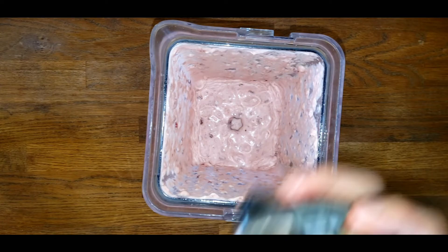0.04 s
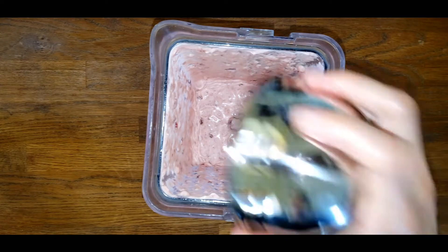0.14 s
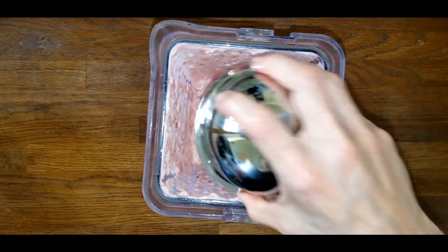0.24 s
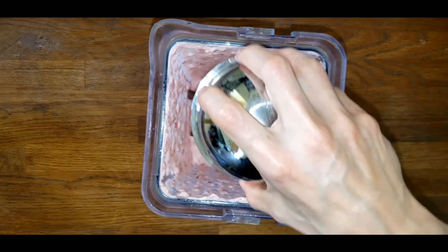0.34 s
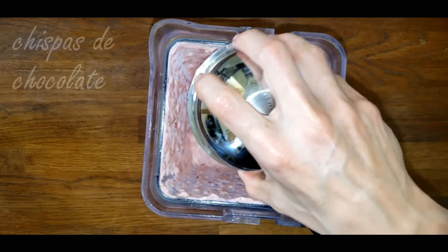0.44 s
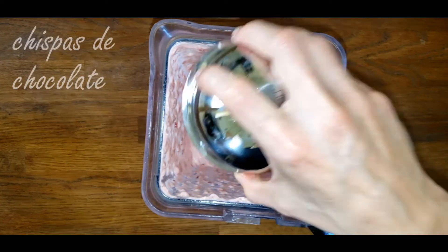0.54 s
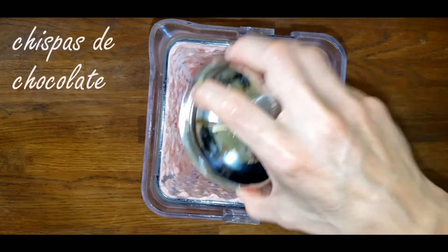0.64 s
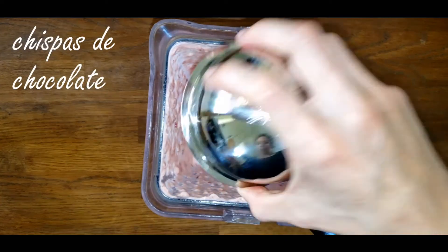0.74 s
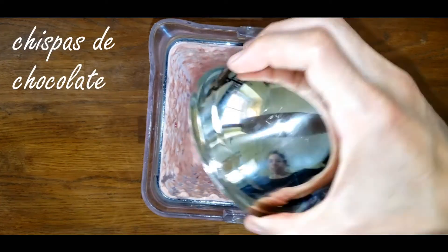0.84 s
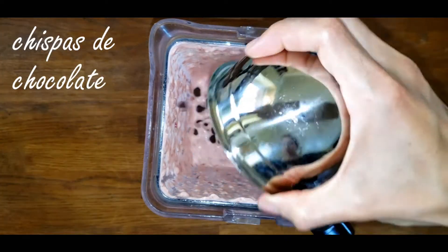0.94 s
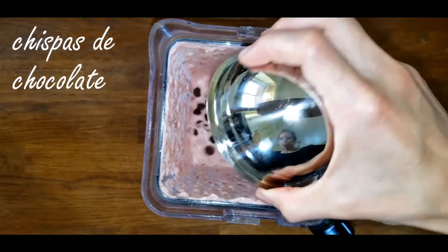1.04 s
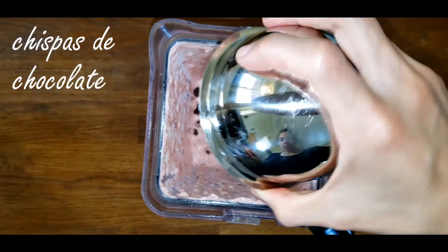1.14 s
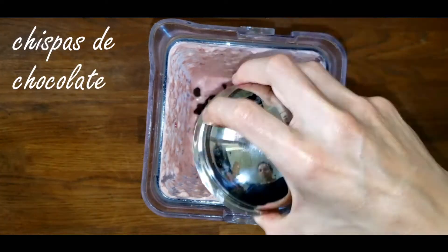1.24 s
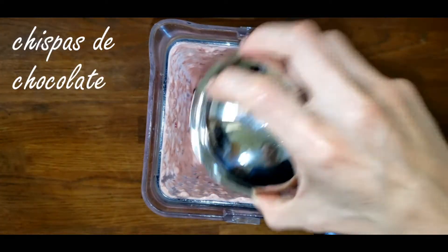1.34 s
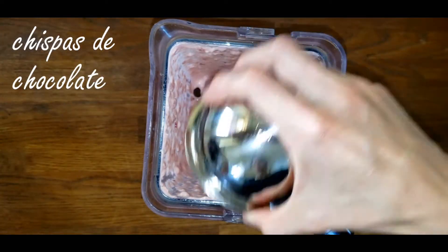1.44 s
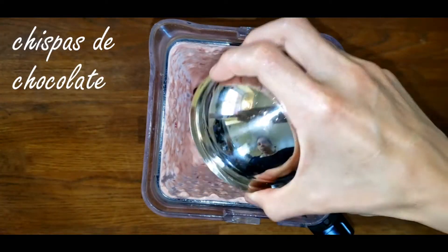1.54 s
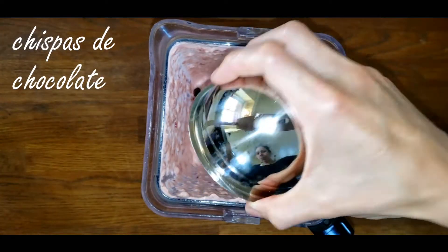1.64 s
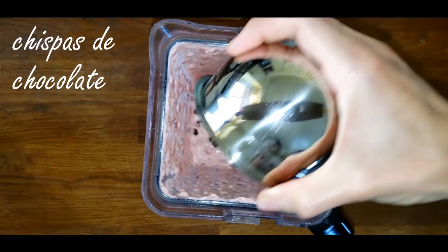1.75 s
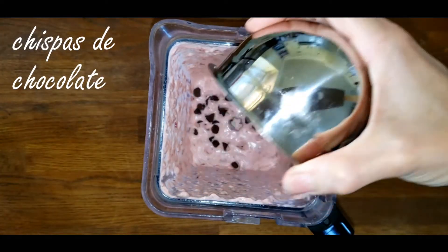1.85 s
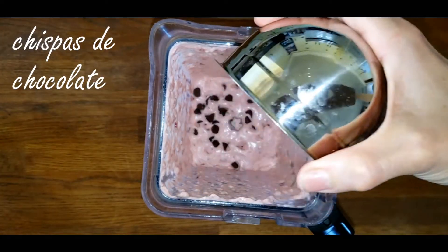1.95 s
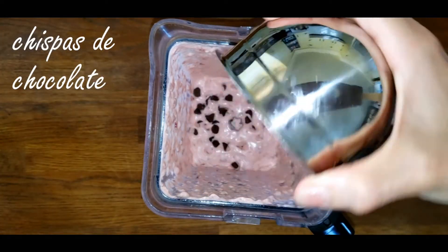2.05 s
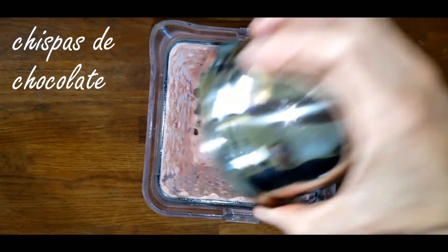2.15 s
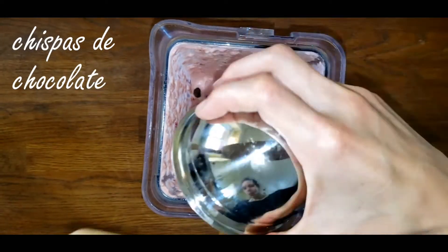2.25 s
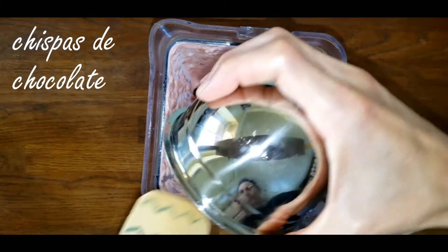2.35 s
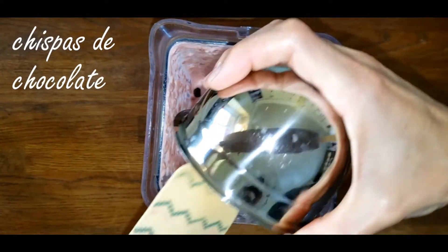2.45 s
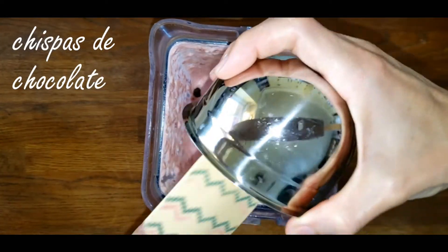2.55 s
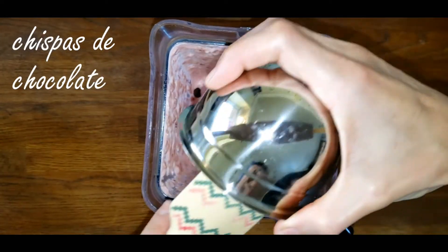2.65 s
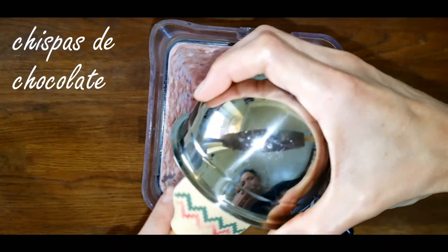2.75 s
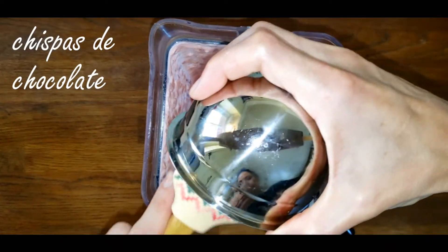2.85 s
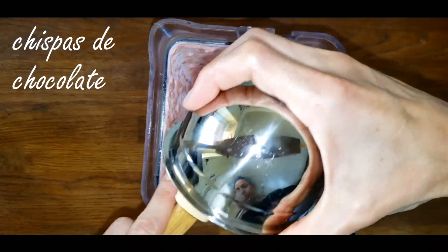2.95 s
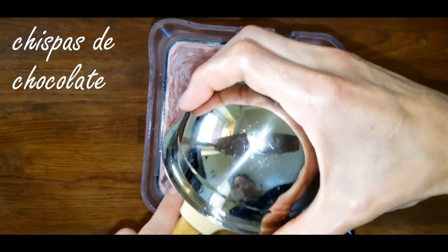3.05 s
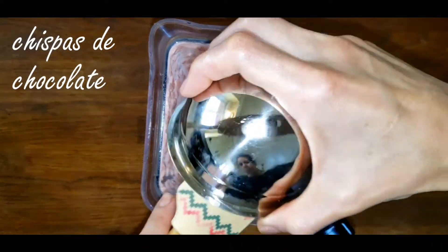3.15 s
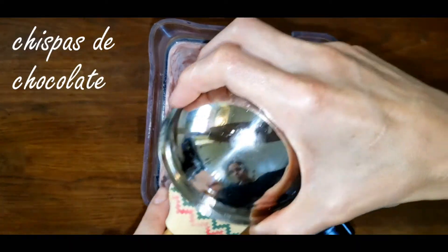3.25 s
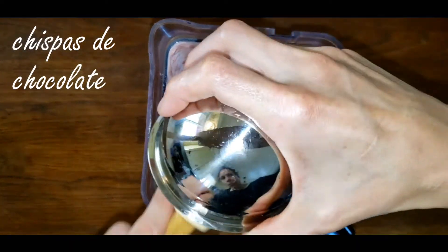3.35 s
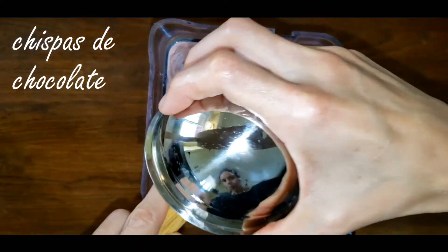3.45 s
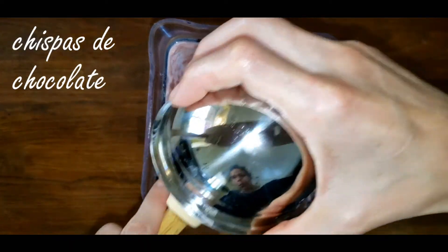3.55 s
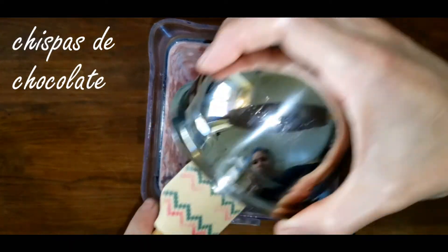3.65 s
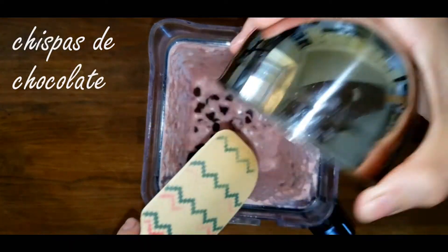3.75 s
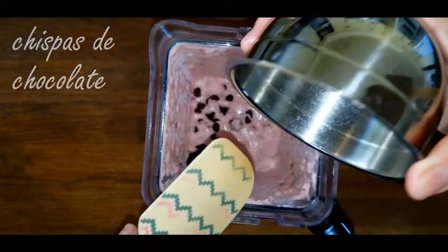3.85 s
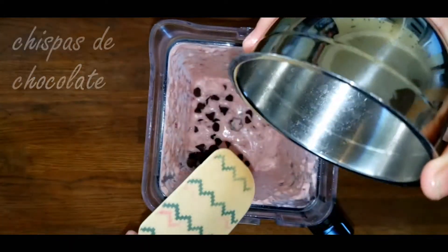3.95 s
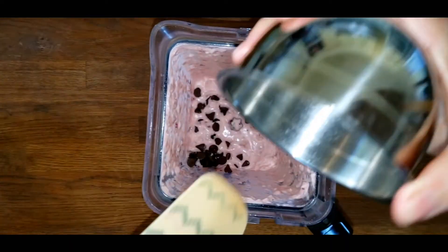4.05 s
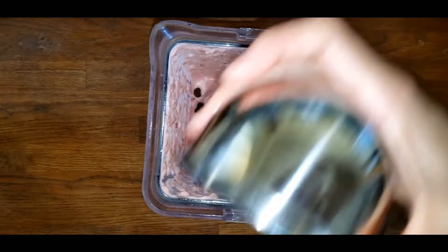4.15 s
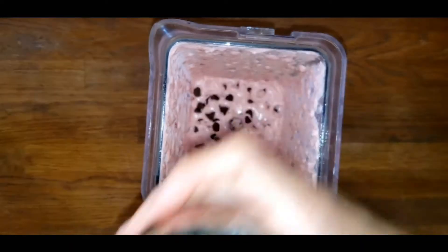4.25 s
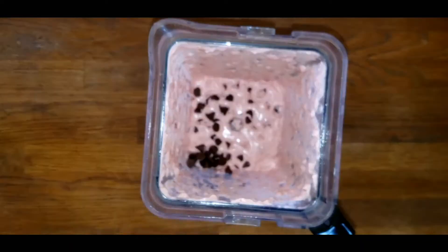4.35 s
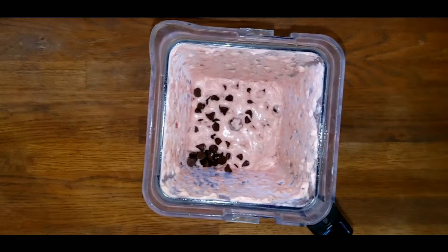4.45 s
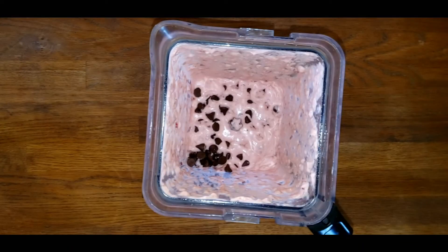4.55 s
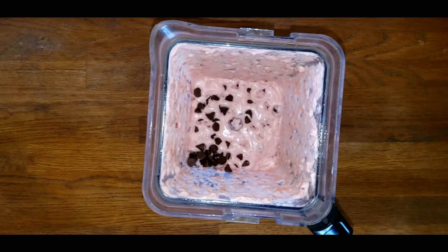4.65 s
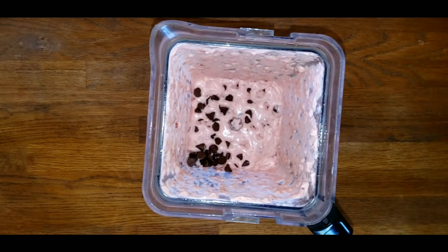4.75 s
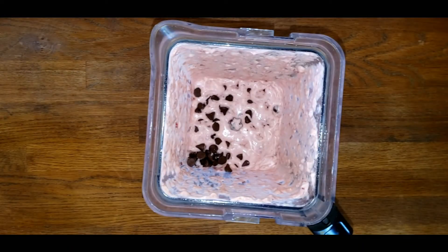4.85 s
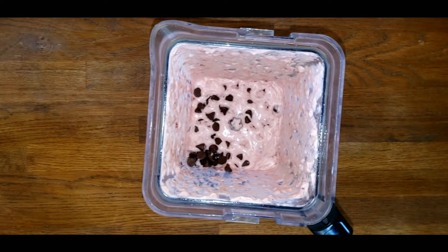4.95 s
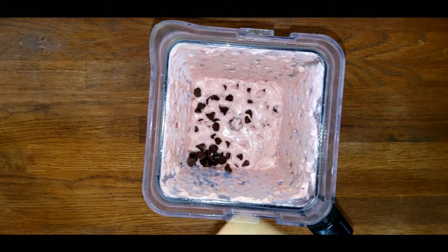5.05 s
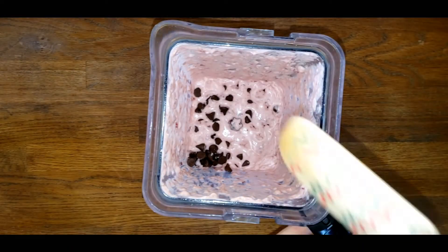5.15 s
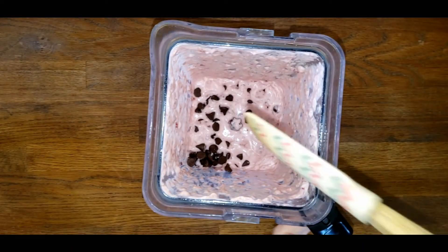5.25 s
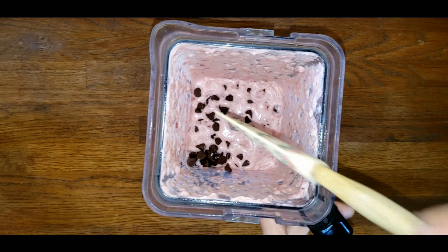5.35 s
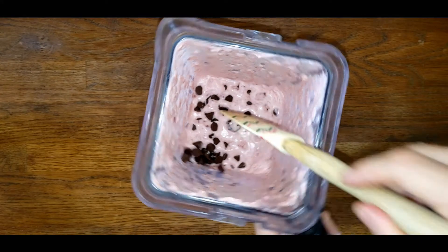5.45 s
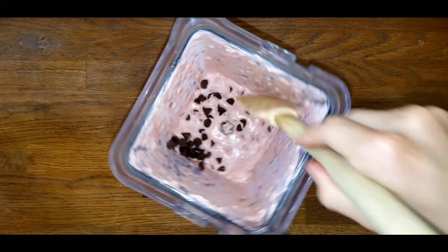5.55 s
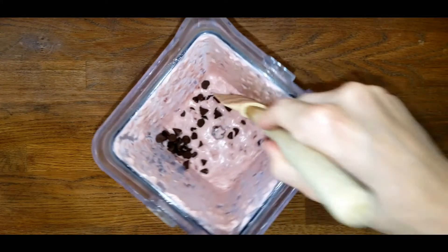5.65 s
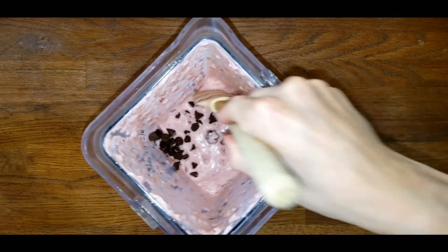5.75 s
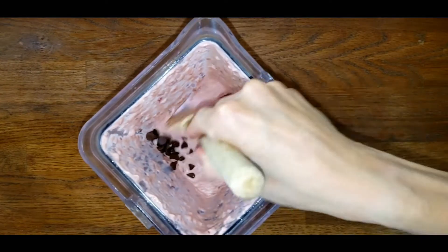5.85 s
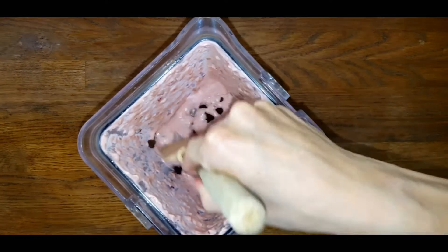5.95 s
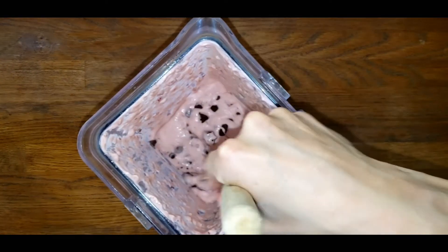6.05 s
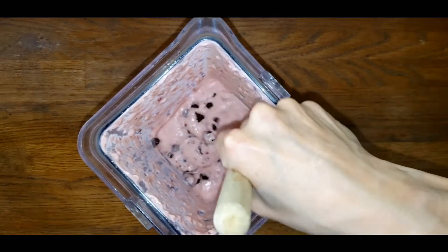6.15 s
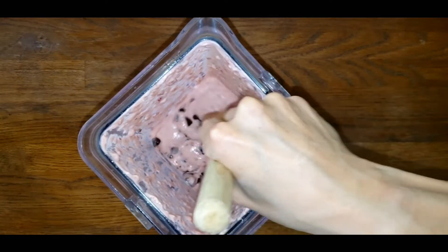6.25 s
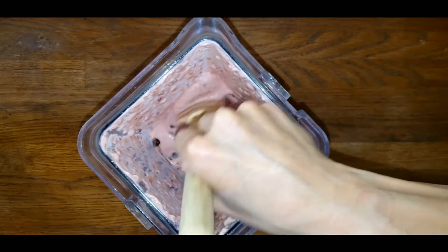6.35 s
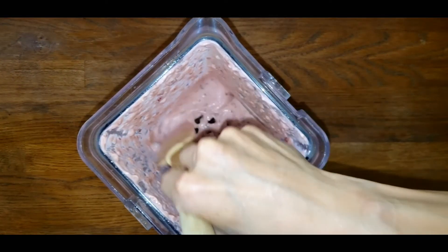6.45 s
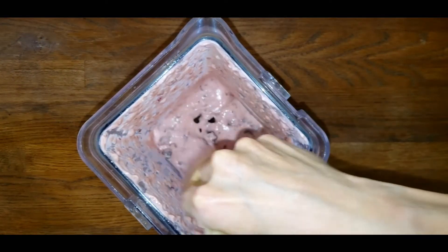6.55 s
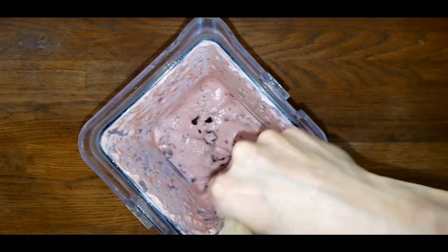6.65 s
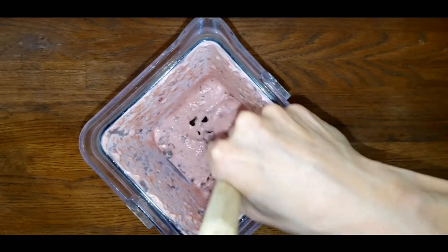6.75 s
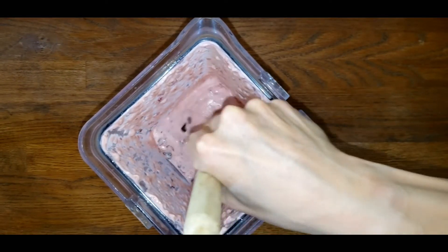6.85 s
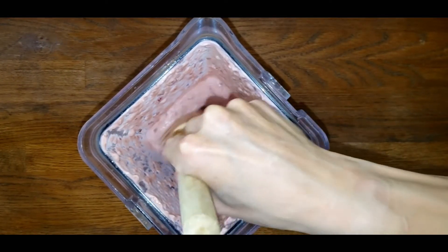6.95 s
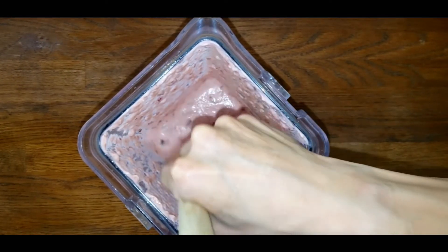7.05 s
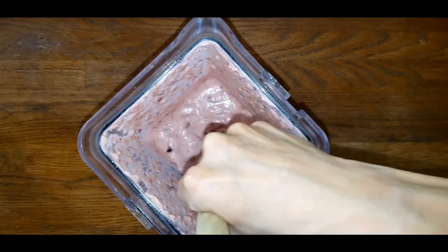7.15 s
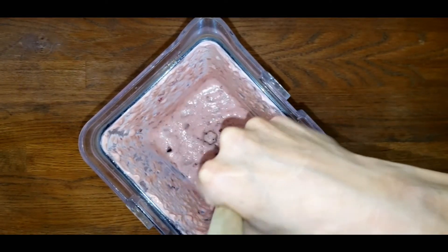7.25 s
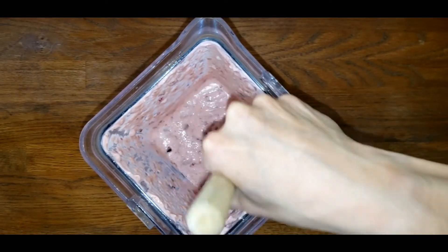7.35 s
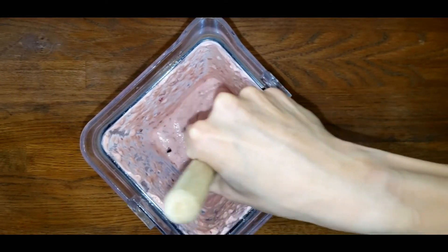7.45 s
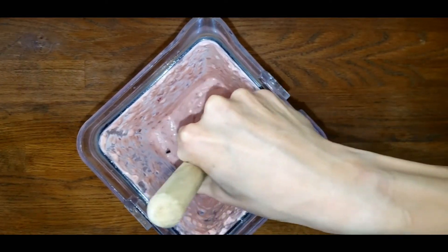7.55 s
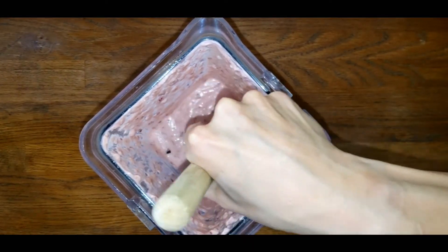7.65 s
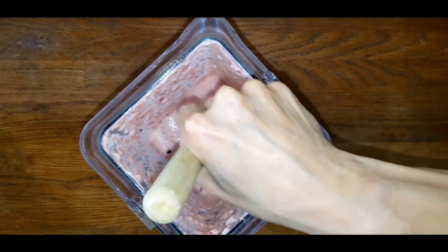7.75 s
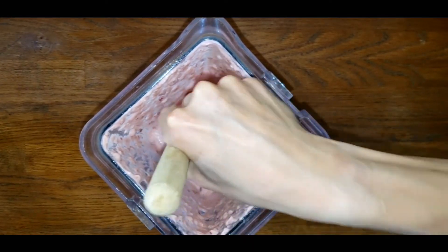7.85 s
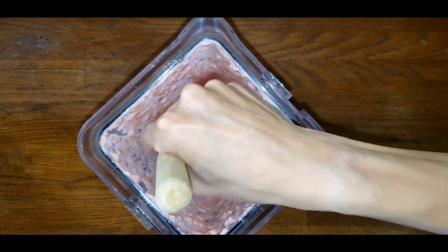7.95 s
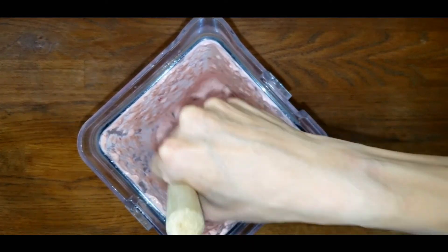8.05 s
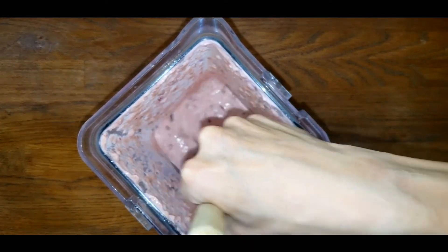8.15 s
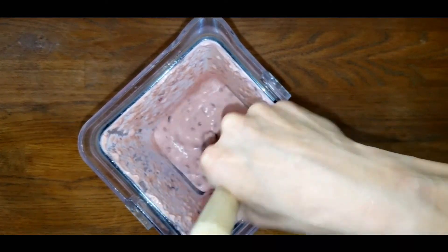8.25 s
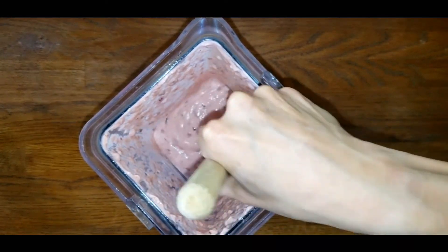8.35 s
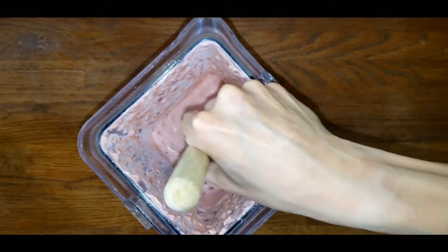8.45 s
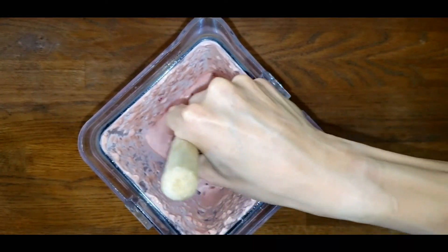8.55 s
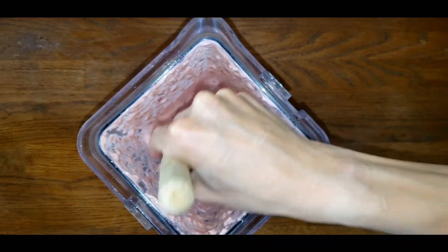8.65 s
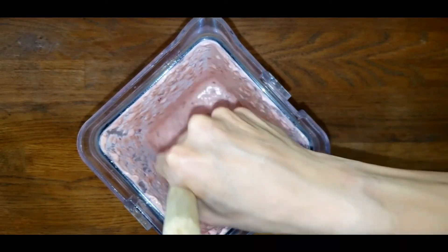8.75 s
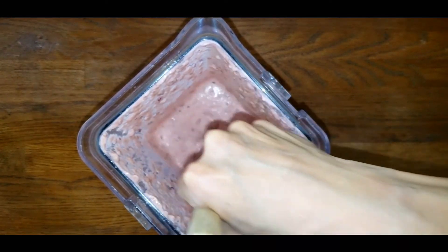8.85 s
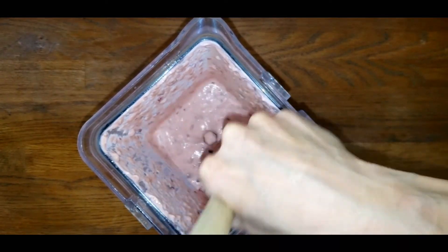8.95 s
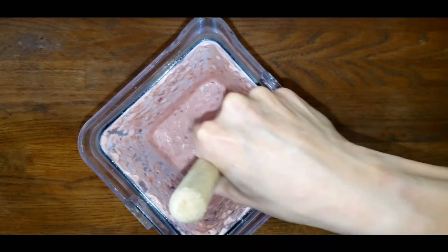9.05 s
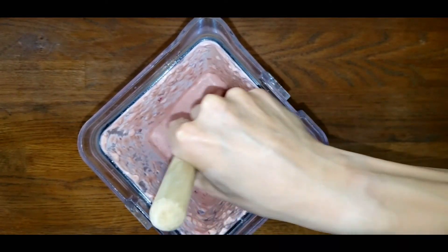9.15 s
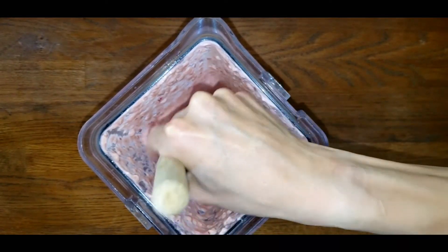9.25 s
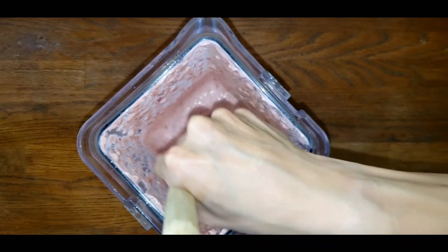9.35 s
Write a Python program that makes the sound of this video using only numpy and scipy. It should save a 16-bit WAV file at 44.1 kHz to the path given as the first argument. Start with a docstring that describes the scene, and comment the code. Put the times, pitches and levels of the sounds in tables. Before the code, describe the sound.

Small chocolate chips rattle in bursts from a steel bowl into a plastic jar of cream, then a spatula scrapes, squelches and knocks while stirring.

```python
"""Chocolate chips, poured four times from a small steel bowl, clink on the steel and land in a plastic jar of cream.
Clinks, knocks and thuds are noise bursts plus decaying modes; streams of chips are showers of short contacts.
The jar is then pushed round on a wooden table: stick-slip grains drive the table and body modes.
A spatula stirs: it rubs and scrapes the wall, pops air pockets in the cream, knocks the jar and rocks it.
A quiet kitchen adds low noise, hum and reverberation; a stereo microphone looks down from just above."""
import sys
import numpy as np
from scipy import signal
from scipy.fft import irfft
from scipy.io import wavfile
from scipy.ndimage import uniform_filter1d

SR = 44100
rng = np.random.default_rng(int(sys.argv[2]) if len(sys.argv) > 2 else 0)


def unload_audio(sound):
    """Save the sound as a 16-bit wav file, at the path given as the first command line argument."""
    columns = np.transpose(np.atleast_2d(sound))
    # keep every value between -1 and 1, then stretch to whole-number steps
    steps = np.round(np.clip(columns, -1, 1) * 32767)
    wavfile.write(sys.argv[1], SR, steps.astype(np.int16))


N = 414099

# All table levels are relative: each function adds its own gains.


def gain_of(db):
    """Amplitude gain of a level in dB."""
    return 10 ** (np.asarray(db) / 20)


def evened(x):
    """Scales to rms 1."""
    return x / np.sqrt(np.mean(x ** 2) + 1e-20)


def blow(x):
    """Scales a hit to rms 1 over its first 20 ms."""
    return x / np.sqrt(np.mean(x[:, :SR // 50] ** 2) + 1e-20)


def held(x, size=2600):
    """Evens out slow swells, as a steady hand pressure does."""
    power = (x ** 2).mean(0)
    power = uniform_filter1d(uniform_filter1d(power, size), size)
    return x / np.sqrt(abs(power) + 1e-9)


def read(points, hz):
    """Interpolates a spectrum on a log-frequency axis."""
    f, value = np.transpose(points)
    return np.interp(np.log(hz + 1), np.log(f), value)


def level(rows, axis):
    """One dB column of a curve as a gain, silent outside its span."""
    rows = np.array(rows)
    t = np.arange(N) / SR
    return gain_of(np.interp(t, rows[:, 0], rows[:, axis], left=-120, right=-120))


def spells(starts, lengths, dbs, rise_s, fall_s, size=5000):
    """Gain over time for a set of movements: each rises, holds for its length and dies away."""
    t = np.linspace(0, N / SR, size)
    since = t[:, None] - starts
    rise = np.clip(since / rise_s, 0, 1)
    fall = np.exp(-np.maximum(since - lengths, 0) / fall_s)
    gain = np.linalg.norm(gain_of(dbs) * rise * fall, axis=1)
    return np.interp(np.arange(N) / SR, t, gain)


def add(mix, s, sound):
    """Mixes a stereo sound in at time s."""
    part = mix[:, max(round(s * SR), 0):][:, :sound.shape[1]]
    part += sound[:, :part.shape[1]]


def pair(z, width):
    """Makes left and right from two signals taken as mid and side."""
    return np.array([z[0] + width * z[1], z[0] - width * z[1]]) / np.hypot(1, width)


def colour(x, spectrum, size=2048):
    """Minimum-phase filter with the given spectrum and energy 1."""
    hz = abs(np.fft.fftfreq(size, 1 / SR))
    log_gain = np.log(gain_of(read(spectrum, hz)))
    taps = np.fft.ifft(np.exp(signal.hilbert(log_gain).conj())).real
    return signal.oaconvolve(x, taps[None] / np.linalg.norm(taps), axes=1)[:, :x.shape[1]]


def varied(spectrum, bumps_db=4.0, shift_oct=0.27):
    """Chips differ in size and shape, and so in pitch and colour."""
    factor = 2 ** (shift_oct * rng.uniform(-1, 1))
    grid_hz = np.geomspace(100, 16000, 26)
    db = read(spectrum, grid_hz / factor) + bumps_db * rng.uniform(-2, 2, len(grid_hz))
    return list(zip(grid_hz, db))


def favour(modes, centre_hz, depth_db):
    """The place of a blow brings out the modes near one pitch: others lose 45 dB/octave, at most depth_db."""
    return [(hz, db - min(45 * abs(np.log2(hz / centre_hz)), depth_db), t60) for hz, db, t60 in modes]


def ring(modes, width, detune, rise_s, size=12000):
    """A struck object: decaying sines, weighted and detuned afresh at each blow."""
    hz, db, t60 = np.transpose(modes)[:, :, None]
    t = np.arange(size, dtype=np.float32) / SR
    weight, shift, phase, apart = rng.uniform(-1.155, 1, (4, len(hz), 1)).astype(np.float32)
    angle = (2 * np.pi * hz * (1 + detune * shift)).astype(np.float32) * t + np.pi * phase
    decay = np.exp((-np.log(1000) / t60).astype(np.float32) * t)
    height = gain_of(db + 3 * weight) * decay
    mid = (height * np.sin(angle)).sum(0)
    side = (height * np.sin(angle + np.pi * apart)).sum(0)
    return blow(pair([mid, side], width) * (1 - np.exp(-t / rise_s)))


def snap(spectrum, fall_s, rattle_db, rattle_s, width, rise_s=1e-5, size=12000):
    """A contact: coloured noise with a sharp burst and a slower, dense rattle."""
    t = np.arange(size) / SR
    burst = np.exp(-t / fall_s)
    rattle = gain_of(rattle_db) * np.exp(-t / rattle_s)
    shape = (burst + rattle) * (1 - np.exp(-t / rise_s))
    return blow(colour(pair(rng.standard_normal((2, size)), width) * shape, spectrum))


def grains(per_s, bed, width):
    """Friction: tiny contacts of uneven size over a bed of smooth noise."""
    size = gain_of(3 * np.minimum(rng.exponential(1, (2, N)), 3))
    size = size * rng.choice([-1, 1], (2, N))
    clicks = size * (rng.random((2, N)) < per_s / SR)
    return pair(evened(clicks) + bed * rng.standard_normal((2, N)), width)


def shower(spectrum, ring_s, width, per_s=520, count=30, size=1024):
    """Many small contacts of chips, drawn from a set of short bursts, each of its own colour."""
    fade = np.exp(-np.arange(size) / SR / ring_s)
    kinds = []
    for _ in range(count):
        burst = pair(rng.standard_normal((2, size)), width) * fade
        kinds.append(blow(colour(burst, varied(spectrum))))
    out = np.zeros((2, N))
    for slot, (when, kind, strength) in enumerate(rng.random((round(per_s * N / SR), 3))):
        add(out, (slot + 2 * when) / per_s, gain_of(14 * strength ** 3) * kinds[int(kind * count)])
    return evened(out)


def resonate(x, modes):
    """Drives an object's modes with a running force."""
    out = 0
    for hz, db, t60 in modes:
        r = np.exp(-np.log(1000) / (t60 * SR))
        poles = [1, -2 * r * np.cos(2 * np.pi * hz / SR), r * r]
        out = out + gain_of(db) * signal.lfilter([1, 0, -1], poles, x)
    # soft contacts carry little treble
    return evened(signal.sosfilt(signal.butter(2, 2 * max(modes)[0], fs=SR, output="sos"), out))


# background level: start_s, level_db
QUIET = [(0, -42.5), (2, -39), (3.6, -41), (4.45, -43.5), (4.8, -54.5), (5.4, -39), (9.39, -36)]
# hum tones, peak against the background level: pitch_hz, level_db
HUM = [(96, -4), (192.3, -4), (727, -17)]
# room noise spectrum: freq_hz, density_db_per_hz
AIR = [(15, -35), (25, -4.5), (44, -18.5), (64, -2.5), (102, -4.5), (123, -9.5), (326, -11.5), (734, -23),
       (1550, -33.5), (2050, -28.5), (2600, -48), (4700, -48), (7920, -58), (11000, -49), (16000, -49)]


def background(air_db=-1):
    """Low room noise and the steady hum of an appliance, on one slow level curve."""
    t = np.arange(N) / SR
    air = evened(colour(pair(rng.standard_normal((2, N)), width=0.61), AIR, size=8192))
    hum = sum(gain_of(db) * np.sin(2 * np.pi * (hz * t + rng.random())) for hz, db in HUM)
    return level(QUIET, axis=1) * (gain_of(air_db) * air + hum)


# kitchen reverberation: freq_hz, t60_s
ROOM_DECAY = [(1000, 0.46), (5000, 0.45), (15000, 0.32)]


def kitchen(x, size=30000, onset_s=0.0077):
    """Diffuse reflections: sparse random taps, each band dying at its own speed."""
    taps = rng.standard_normal((2, size)) * (rng.random((2, size)) < .15)
    taps = taps * (np.arange(size) > onset_s * SR)
    hz, t, z = signal.stft(pair(taps, width=0.81), SR, nperseg=256)
    fade = gain_of(-60 * t / read(ROOM_DECAY, hz)[:, None])
    tail = signal.istft(z * fade, SR, nperseg=256)[1]
    return signal.oaconvolve(x, tail / np.linalg.norm(tail[0]), axes=1)[:, :N]


# lean of the microphone pair: freq_hz, left_minus_right_db
LEAN = [(70, -9.5), (130, 1), (1100, 0.5), (2100, 5.5), (4000, 0), (7500, -5.5), (13000, -5.5)]


def heard_from_above(x):
    """The jar's mouth sends each band more to one microphone than to the other."""
    lean_db = read(LEAN, np.fft.rfftfreq(1023, 1 / SR))
    sides = irfft(gain_of(np.array([lean_db, -lean_db]) / 2), 1023)
    return signal.oaconvolve(x, np.fft.fftshift(sides, axes=1), "same", axes=1)


# modes of the jar on the table: pitch_hz, level_db, t60_s
TABLE = [(81.9, -5, 0.5), (125, 4, 0.17), (145.7, 0, 0.36), (192.7, -8, 0.28), (217.6, -5.5, 0.25),
         (237.6, -9, 0.32)]
# modes of the jar's hollow body: pitch_hz, level_db, t60_s
BODY = [(339, -2, .12), (392, -5, .1), (440, 0, .13), (497, -3, .12), (562, -2, .17), (670, -5, .17),
        (785, -7, .13), (950, -8, .12)]
# contact colours, cream plop, swish and rubbing: freq_hz, level_db
PLOP = [(120, -7), (300, -3.5), (480, 3), (1100, -5.5), (1800, -10), (5000, -42.5)]
HISS = [(500, -4), (3000, -4.5), (5200, -10), (7500, -14.5), (12000, -6.5), (16000, -13)]
RUB = [(200, 6), (480, 13), (850, -6.5), (1100, 5.5), (2600, 6), (3500, -4), (5000, -14), (8000, -73)]
# the hand pushes the jar round: start_s, length_s, judder_db, hollow_db, swish_db
PUSHES = [(5.098, 0.1, -36.5, -38.5, -38), (5.404, 0.039, -21.5, -31.5, -39),
          (5.473, 0.11, -14.5, -31, -39.5), (5.626, 0.17, -20, -36.5, -44)]
PUSH_RISE_S, PUSH_FALL_S = 0.031, 0.025
SWISH_RISE_S, SWISH_FALL_S = 0.066, 0.062
# spatula strokes through the cream: start_s, length_s, pressure_db, rub_db
STROKES = [(5.856, 0.4, -33.5, -65), (6.448, 0.28, -31.5, -71), (6.664, 0.23, -26.5, -55),
           (6.99, 0.11, -30, -66), (7.325, 0.28, -29.5, -63), (7.71, 0.5, -41.5, -71),
           (8.507, 0.24, -37, -45.5), (8.773, 0.53, -34.5, -50.5)]
STROKE_RISE_S, STROKE_FALL_S = 0.059, 0.029


def sliding(judder_db=-1, hollow_db=-3, swish_db=-2, rock_db=0, rub_db=1, slosh_db=-12):
    """Stick and slip shakes the jar on the table; cream and chips rub along its wall."""
    slips = grains(per_s=250, bed=.5, width=.35)
    judder = held(resonate(slips, TABLE))
    hollow = held(resonate(slips, BODY) + .5 * evened(colour(slips, PLOP)))
    swish = evened(colour(grains(per_s=900, bed=1.2, width=.8), HISS))
    starts, lengths, shake_db, body_db, hiss_db = np.transpose(PUSHES)
    drag = spells(starts, lengths, shake_db + judder_db, PUSH_RISE_S, PUSH_FALL_S) * judder
    drag += spells(starts, lengths, body_db + hollow_db, PUSH_RISE_S, PUSH_FALL_S) * hollow
    # surfaces cling and let go, so swish and rubbing come in clumps
    slow = uniform_filter1d(uniform_filter1d(rng.standard_normal(N), 700), 400)
    cling = gain_of(5.5 * evened(slow))
    clumped_swish = evened(swish * np.sqrt(cling))
    drag += spells(starts, lengths, hiss_db + swish_db, SWISH_RISE_S, SWISH_FALL_S) * clumped_swish
    rub = evened(shower(RUB, ring_s=.002, width=.65, per_s=300) * cling)
    # a stroke rocks the jar, sounds its hollow body and rubs the wall
    starts, lengths, pressure_db, wall_db = np.transpose(STROKES)
    pressure = spells(starts, lengths, pressure_db, STROKE_RISE_S, STROKE_FALL_S)
    rubbing = spells(starts, lengths, wall_db + rub_db, STROKE_RISE_S, STROKE_FALL_S)
    rocking = gain_of(rock_db) * judder + gain_of(slosh_db) * hollow
    return drag + pressure * rocking + rubbing * rub


# the jar rocks on its base: start_s, length_s, level_db
WOBBLES = [(6.486, 0.037, -21.5), (6.765, 0.1, -22.5), (7.364, 0.18, -22)]


def wobble():
    """Leaned on by the spatula, the jar rocks on its base with one deep note, its lowest table mode."""
    starts, lengths, dbs = np.transpose(WOBBLES)
    note = np.sin(2 * np.pi * TABLE[0][0] * np.arange(N) / SR)
    return spells(starts, lengths, dbs, PUSH_RISE_S, PUSH_FALL_S) * note


SQUELCH_PER_S, SQUELCH_HZ, SQUELCH_SPREAD_OCT = 40, 600, 1.2
SQUELCH_CYCLES = 2.6  # decay to 1/e


def squelches(squelch_db=16, spread_db=7, size=2500):
    """All through the stirring, air pockets pop in the cream at random, louder when the spatula rubs harder."""
    out, t = np.zeros((2, N)), np.arange(size) / SR
    starts, lengths, _, wall_db = np.transpose(STROKES)
    count = round((starts[-1] + lengths[-1] - starts[0]) * SQUELCH_PER_S)
    for slot, (when, pitch, strength, side) in enumerate(rng.uniform(-0.77, 1, (count, 4))):
        s = starts[0] + (slot + when) / SQUELCH_PER_S
        hz = SQUELCH_HZ * 2 ** (SQUELCH_SPREAD_OCT * pitch)
        envelope = np.exp(-hz * t / SQUELCH_CYCLES) * (1 - np.exp(-hz * t))
        pop = np.sin(2 * np.pi * hz * t) * envelope
        ears = np.array([[1 + side / 2], [1 - side / 2]])
        db = np.interp(s, starts + lengths / 2, wall_db) + squelch_db + spread_db * strength
        add(out, s, gain_of(db) * ears * pop)
    return out


# short wet scrapes of the spatula: start_s, grating_db, pocket_hz, pop_db
SCRAPES = [(6.034, -25, 538, -30), (6.197, -27, 420, -24), (6.335, -23, 935, -28), (6.581, -25, 430, -22),
           (6.602, -21, 463, -16), (6.736, -26.5, 441, -11.5), (7.014, -26.5, 425, -24.5),
           (7.04, -31, 760, -30.5), (7.096, -29, 1260, -34), (7.121, -35, 510, -24.5),
           (7.179, -24, 404, -21.5), (7.206, -17.5, 477, -23), (7.545, -22.5, 345, -20.5),
           (7.83, -33, 430, -21.5), (7.981, -30.5, 343, -30), (8.016, -24.5, 337, -25.5),
           (8.146, -24.5, 1240, -36), (8.21, -29, 436, -31), (8.295, -22.5, 398, -15.5),
           (9.124, -21.5, 458, -19), (9.327, -28.5, 222, -5.5)]
# chips caught under the blade: start_s, strength_db
CAUGHT = [(2.573, -39.5), (5.766, -35.5), (5.786, -29.5), (5.921, -28.5), (6.467, -31), (6.668, -29.5),
          (6.711, -35), (6.973, -42)]
# contact colours, grating and chip on plastic: freq_hz, level_db
GRATE = [(250, 2.5), (480, 8), (850, -5), (1400, -2.5), (2600, -7.5), (4500, -36.5), (9000, -41)]
TICK = [(400, -3.5), (1000, -1), (2200, 9), (3300, 9), (5000, 4), (7000, -6.5), (10000, -12.5),
        (16000, -57)]
POCKET_S = .005
POCKET_GLIDE_PER_S = .5  # in the phase: pitch rises at twice this fraction per second


def scrapes(scrape_db=-10, pocket_db=-11, swell_s=0.0089, click_db=-3, size=6000):
    """Chips grate along the wall in a short clump while an air pocket opens in the cream; single ones click."""
    out, t = np.zeros((2, N)), np.arange(size) / SR
    swell = np.sqrt(t / swell_s) * np.exp(-t / swell_s / 2)
    for s, db, hz, pop_db in SCRAPES:
        grit = rng.standard_normal((2, size)) * (rng.random(size) < 600 / SR)  # 600 grains/s
        clump = colour(pair(grit, width=0.78) * swell, varied(GRATE, bumps_db=3.5, shift_oct=.1))
        tone = np.sin(2 * np.pi * hz * t * (1 + POCKET_GLIDE_PER_S * t))
        pocket = tone * t * np.exp(-t / POCKET_S)
        clump_gain, pocket_gain = gain_of(db + scrape_db), gain_of(pop_db + pocket_db)
        add(out, s, clump_gain * blow(clump) + pocket_gain * blow(pocket[None]))
    for s, db in CAUGHT:
        click = snap(varied(TICK), fall_s=.002, rattle_db=-12, rattle_s=.01, width=.6)
        add(out, s, gain_of(db + click_db) * click)
    return out


# spatula taps the jar as it is brought in: start_s, note_db, tick_db
TAP = (2.503, -27.5, -33)
TAP_HZ, TAP_FALL_S = 560, .015


def tap(size=8000):
    """A light noise tick of the spatula and one decaying hollow note."""
    s, note_db, tick_db = TAP
    t = np.arange(size) / SR
    note = blow(np.sin(2 * np.pi * TAP_HZ * t)[None] * np.exp(-t / TAP_FALL_S))
    tick = snap(HISS, fall_s=.003, rattle_db=-10, rattle_s=.025, width=.6, size=size)
    out = np.zeros((2, N))
    add(out, s, gain_of(note_db) * note + gain_of(tick_db) * tick)
    return out


# the hand grips the jar, then the spatula knocks it:
# start_s, strength_db, hardness_0_to_1, hollow_hz, spot_hz, clack_db, thud_db
KNOCKS = [(5.135, -53, 0.2, 339, 340, -19, -28.5), (5.4158, -28.5, 0.42, 339, 756, -24.5, -22),
          (5.9277, -26.5, 0.67, 330, 2660, -27.5, -42), (6.1, -17, 0.26, 700, 930, -19.5, -28),
          (6.357, -18.5, 0.35, 460, 3460, -22.5, -62), (6.4769, -18.5, 0.25, 353, 2780, -23, -40),
          (6.6442, -11, 0.37, 425, 1660, -12.5, -18.5), (6.7282, -24.5, 0.43, 440, 770, -20, -22.5),
          (6.841, -24, 0.25, 330, 1410, -22, -29), (6.871, -20, 0.32, 342, 1310, -22.5, -35.5),
          (7.2345, -10.5, 0.27, 440, 482, -8.5, -23), (7.3519, -26, 0.55, 436, 467, -26, -23.5),
          (7.434, -30, 0.3, 463, 1350, -24.5, -32), (7.46, -27, 0.31, 343, 1390, -28, -30),
          (7.7121, -33.5, 0, 562, 293, -9.5, -19), (8.312, -25, 0.36, 339, 450, -17, -20.5),
          (8.4452, -30, 0.5, 492, 556, -17, -19.5), (8.4932, -6, 0.42, 467, 1463, -12, -25.5),
          (8.6846, -27, 1, 344, 3740, -28, -21), (8.844, -23.5, 0.4, 507, 1408, -31, -33.5),
          (8.913, -16, 0.25, 440, 3400, -21.5, -23), (9.008, -18.5, 0.39, 383, 443, -10, -21),
          (9.163, -11, 0.54, 472, 1407, -9.5, -22), (9.3084, -24.5, 0.38, 440, 1393, -31, -23)]
# modes of the plastic wall: pitch_hz, level_db, t60_s
WALL = [(1301, 0, .22), (1399, -5, .1), (1520, -2, .16), (1660, -1, .2), (1875, -4, .1), (2110, -3, .11),
        (2462, -3, .09), (3200, -7, .05)]
# colour of a hard hit: freq_hz, level_db
CRACK = [(1500, 18.5), (3500, 21.5), (5000, 18.9), (7000, 16.6), (12000, 16.9), (16000, 6.9)]
HOLLOW_SHARE = 0.53  # dB of hollow body per dB of blow plus thud
CRACK_GAIN_DB = 41.5  # from a blow cushioned by cream (hardness 0) to a bare one (1)
CLACK_SLOPE_DB_PER_OCT = 35  # on both sides of the struck spot's pitch
THUD_LAG_S = 0.00814  # the jar tips before it thumps the table


def knocks(contact_db=-9.0, clack_db=-11, wall_db=-3, body_db=-1.5, thud_db=-1.0, crack_db=-38,
           skid_db=-22, skid_s=0.039):
    """The spatula skids up to the wall and hits it; the spot clacks, the jar sounds hollow and thumps the table."""
    out = np.zeros((2, N))
    for s, db, hardness, hollow_hz, spot_hz, spot_db, low_db in KNOCKS:
        hardness = np.clip(hardness, 0, 1)
        hollow_db = HOLLOW_SHARE * (db + low_db)
        top_db = db + CRACK_GAIN_DB * hardness
        # the skid grows up to the moment of contact
        skid = colour(rng.standard_normal((2, 2048)), GRATE)
        before_s = np.arange(skid.shape[1])[::-1] / SR
        add(out, s - before_s[0], gain_of(db + skid_db) * skid * np.exp(-before_s / skid_s))
        contact = snap(RUB, fall_s=.004, rattle_db=-10, rattle_s=.016, width=.65)
        hump = [(spot_hz * 2. ** octave, -CLACK_SLOPE_DB_PER_OCT * abs(octave)) for octave in (-2, 0, 2)]
        clack = snap(hump, fall_s=.005, rattle_db=-14, rattle_s=.016, width=.5, rise_s=.002)
        # blows low down in the cream leave the wall silent
        if spot_hz > BODY[-2][0]:
            wall = ring(favour(WALL, spot_hz, depth_db=11), width=.6, detune=.005, rise_s=.001)
            clack = clack + gain_of(wall_db) * wall
        body = ring(favour(BODY, hollow_hz, depth_db=9), width=.3, detune=.025, rise_s=.002)
        thud = ring(TABLE, width=.35, detune=.025, rise_s=.007)
        crack = snap(CRACK, fall_s=0.0013, rattle_db=-12.0, rattle_s=0.022, width=1.0)
        add(out, s, gain_of(db + contact_db) * contact)
        add(out, s, gain_of(spot_db + clack_db) * clack)
        add(out, s, gain_of(hollow_db + body_db) * body)
        add(out, s + THUD_LAG_S, gain_of(low_db + thud_db) * thud)
        add(out, s, gain_of(top_db + crack_db) * crack)
    return out


# chips strike the steel: start_s, strength_db, strike_hz, ring_db (what the fingers leave)
CLINKS = [(0.2853, -39.5, 3700, -2.5), (0.7981, -31, 2820, 3), (0.8121, -19, 2820, -8),
          (0.841, -18, 4985, -15), (0.868, -19, 2820, -11), (1.4192, -33, 2820, 4),
          (1.4621, -30.5, 3700, -15), (2.3701, -21, 2160, -4.5), (2.6354, -18, 3700, -9),
          (2.689, -29, 3700, 2), (2.7214, -11, 3700, -10.5), (2.813, -16.5, 3700, 3.5),
          (2.827, -15, 2260, -6), (2.835, -6, 4960, -6)]
# modes of the steel bowl: pitch_hz, level_db, t60_s
BOWL = [(732, -10, .4), (2159, -9, .42), (2260, -5, .1), (2820, -4, .1), (3657, -4, .18), (3700, -3, .23),
        (4985, -3, .19), (5614, -7, .2), (6200, -10, .15), (10570, -9, .13)]
# contact colours, steel clash and top sparkle: freq_hz, level_db
CLASH = [(500, -17.5), (1600, -23), (2250, -13.5), (3150, -16), (3700, -4), (4300, -18.5), (4950, -10),
         (6200, -16.5), (8000, -48), (16000, -35)]
SPARKLE = [(4000, -46), (7000, -3), (9200, -2.5), (11500, 4.5), (16000, 2.5)]
SPARKLE_GROWTH = 1.36  # dB of sparkle per dB of strength: harder hits are brighter


def bowl(clash_db=-10.5, sparkle_db=-10, faint_db=-6.5, count=30):
    """Each chip gives the steel a bright clash and a thin damped ring; many faint modes crowd the main ones."""
    out = np.zeros((2, N))
    faint_hz = 2000 * 7 ** rng.random(count)
    faint = [(hz, faint_db + read(CLASH, hz) / 2, .2) for hz in faint_hz]
    for s, db, strike_hz, ring_db in CLINKS:
        clash = snap(CLASH, fall_s=0.00042, rattle_db=-8, rattle_s=0.0093, width=0.8, rise_s=0.00035)
        modes = favour(BOWL + faint, strike_hz, depth_db=8)
        tone = gain_of(ring_db) * ring(modes, width=.6, detune=.002, rise_s=.0003)
        sparkle = snap(SPARKLE, fall_s=0.0011, rattle_db=2.5, rattle_s=0.012, width=1.0)
        add(out, s, gain_of(db + clash_db) * (clash + tone))
        add(out, s, gain_of(SPARKLE_GROWTH * db + sparkle_db) * sparkle)
    return out


# single chips that stand out as they land: start_s, strength_db
LANDINGS = [(0.395, -25), (0.4139, -17.5), (0.432, -14), (0.4829, -26.5), (0.5038, -18.5), (0.5224, -17),
            (0.532, -23), (0.9622, -20.5), (0.9848, -19), (1.006, -24), (1.0309, -16.5), (1.051, -22),
            (1.398, -47), (1.519, -26), (1.56, -19), (1.5673, -17.5), (1.597, -23.5), (1.695, -37.5),
            (2.863, -12.5), (2.9593, -20.5), (2.991, -17), (3.03, -19.5), (3.0675, -17), (3.1256, -17.5),
            (3.1701, -17), (3.229, -22)]
# each shake drops a clump of chips: start_s, length_s, flow_db, floor_drum_db
SHAKES = [(0.391, 0.045, -22.5, -16), (0.498, 0.019, -21, -21), (0.966, 0.054, -35, -24),
          (1.521, 0.064, -44, -22.5), (2.843, 0.17, -25, -37.5), (2.959, 0.052, -19, -33),
          (3.051, 0.061, -15, -27.5), (3.107, 0.084, -20.5, -26.5)]
SHAKE_RISE_S, SHAKE_FALL_S, DRUM_FALL_S = 0.0097, 0.018, 0.052
PLOP_GROWTH = 0.52  # dB of plop per dB of strength: the cream cushions hard landings


def chips(tick_db=-11, plop_db=-20, snap_db=-17, rattle_db=-8, fizz_db=-13, patter_db=-7.5, drum_db=-3.0):
    """Chips tick on the plastic and plop into the cream; their stream drums the jar floor."""
    out = np.zeros((2, N))
    for s, db in LANDINGS:
        tick = snap(varied(TICK), fall_s=.0006, rattle_db=-12, rattle_s=.008, width=.55)
        plop = snap(varied(PLOP), fall_s=.004, rattle_db=-1, rattle_s=.016, width=.35)
        sparkle = snap(SPARKLE, fall_s=0.0001, rattle_db=-2.0, rattle_s=0.01, width=0.9)
        add(out, s, gain_of(db + tick_db) * tick)
        add(out, s, gain_of(PLOP_GROWTH * db + plop_db) * plop)
        add(out, s, gain_of(db + snap_db) * sparkle)
    ticks = shower(TICK, ring_s=.001, width=.7)
    fizz = shower(SPARKLE, ring_s=.0008, width=1)
    rattle = held(ticks + gain_of(fizz_db) * fizz)
    weight = shower(PLOP, ring_s=.005, width=.35)
    patter = held(weight + resonate(weight, BODY))
    drum = held(resonate(weight, TABLE))
    starts, lengths, flow_db, floor_db = np.transpose(SHAKES)
    flow = spells(starts, lengths, flow_db, SHAKE_RISE_S, SHAKE_FALL_S)
    out += flow * (gain_of(rattle_db) * rattle + gain_of(patter_db) * patter)
    return out + spells(starts, lengths, floor_db + drum_db, SHAKE_RISE_S, DRUM_FALL_S) * drum


def scene():
    """Sums the sources, adds reverberation and stereo lean, then the background."""
    poured = bowl() + chips()
    knocked = knocks() + tap()
    stirred = sliding() + scrapes() + squelches()
    wet = kitchen(gain_of(-7.5) * poured + gain_of(-7.0) * knocked + gain_of(-7.0) * stirred)
    # a small jar radiates little below its lowest mode
    high_pass = signal.butter(4, 58, "highpass", fs=SR, output="sos")
    jar = signal.sosfilt(high_pass, poured + knocked + stirred + wet)
    return heard_from_above(jar + wobble()) + background()


EDGE_HZ = 15750


def record(dry):
    """The recorder's band limit: a linear-phase low-pass."""
    taps = signal.firwin(255, EDGE_HZ, window=("kaiser", 9), fs=SR)
    return signal.oaconvolve(dry, taps[None], "same")


dry = scene()
out = record(dry)
unload_audio(out)
```